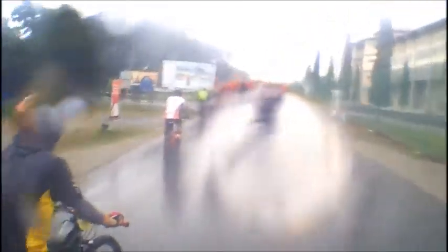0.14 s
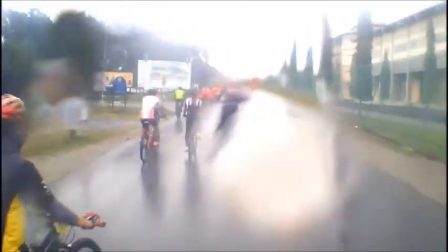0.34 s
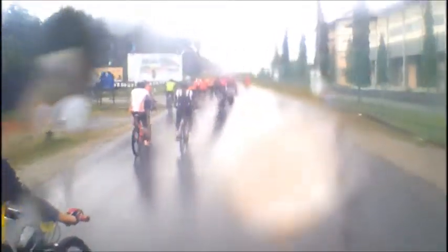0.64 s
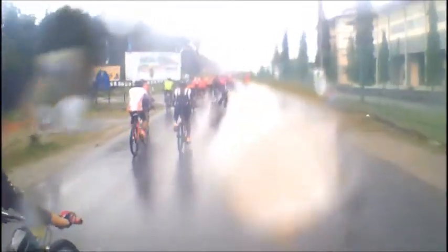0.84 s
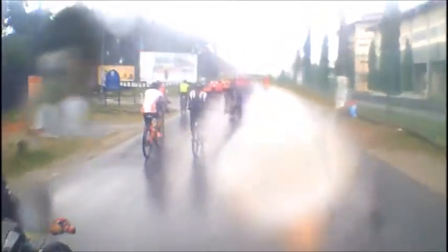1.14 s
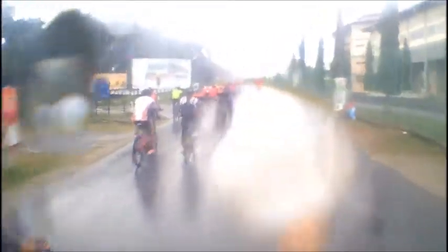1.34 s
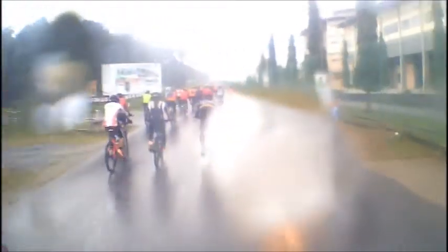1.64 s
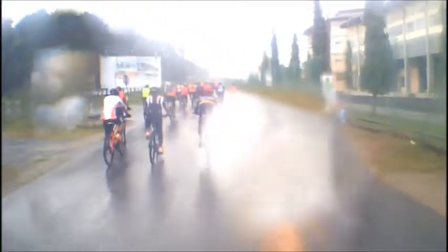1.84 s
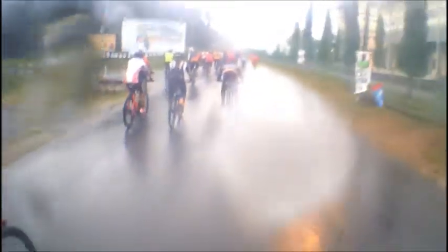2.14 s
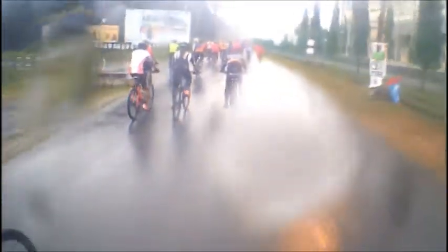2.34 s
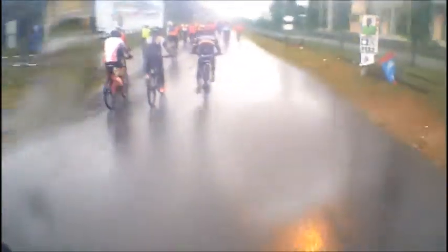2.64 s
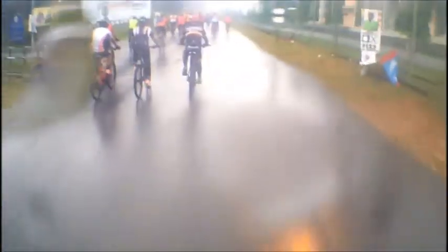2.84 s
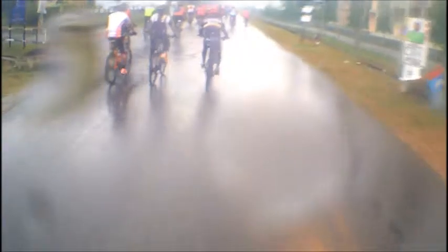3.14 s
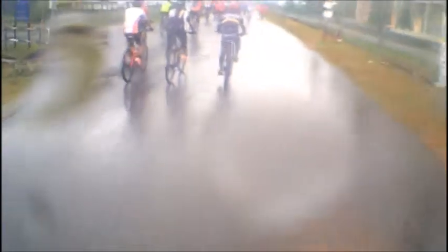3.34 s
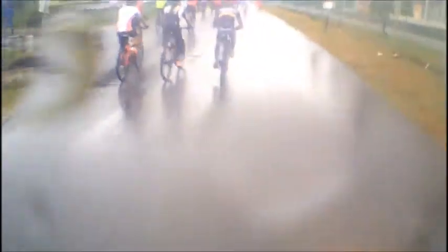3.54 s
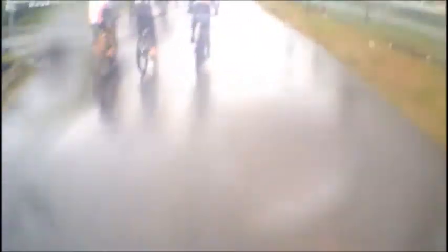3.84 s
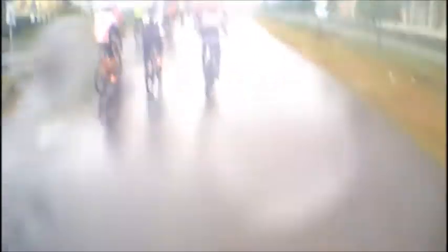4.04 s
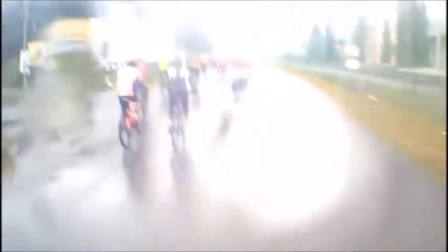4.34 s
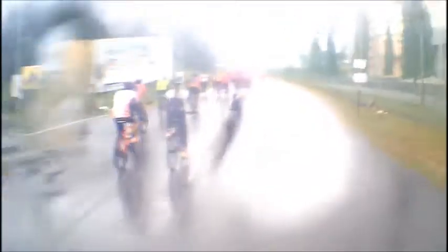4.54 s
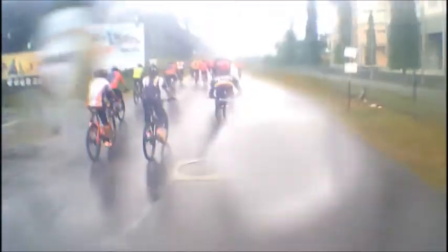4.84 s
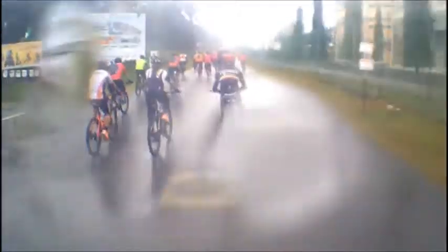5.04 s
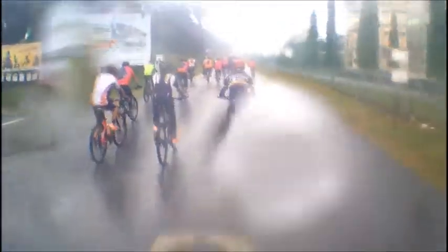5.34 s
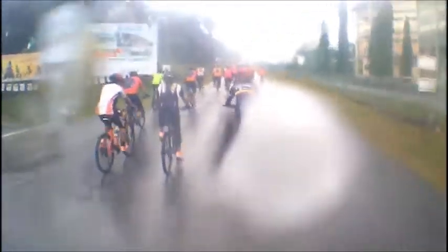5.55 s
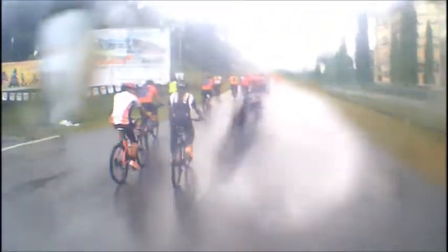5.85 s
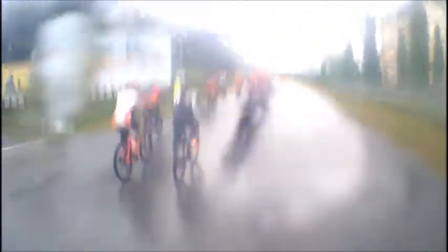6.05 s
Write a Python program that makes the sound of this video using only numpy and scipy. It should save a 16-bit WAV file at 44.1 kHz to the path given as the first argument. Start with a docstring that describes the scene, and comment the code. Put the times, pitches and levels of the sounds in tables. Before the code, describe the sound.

Irregular hard plastic clacks, taps and ticks as rain and spray strike a camera case on a bicycle, over quiet low rumble and muffled wet-road hiss.

```python
"""A wet road in the rain: a small camera in a plastic case rides on a bicycle.
Its electronics tick and whine faintly: gated noise and sines of wandering phase.
The frame sways and rumbles, the road hums and wet tyres hiss through the case: shaped noise.
The mount sings and thumps: decaying sines.
Nearest of all, drops and spray strike the case, which clacks: short forces excite its modes."""
import sys
import numpy as np
from scipy import signal
from scipy.fft import rfft, irfft
from scipy.io import wavfile

SR = 44100
rng = np.random.default_rng(int(sys.argv[2]) if len(sys.argv) > 2 else 0)


def dump(signal):
    """Clip the signal to [-1, 1] and save it as 16-bit WAV at the path in sys.argv[1]."""
    limited = np.clip(np.atleast_2d(signal).T, -1, 1)
    pcm = np.round(limited * 32767).astype(np.int16)
    wavfile.write(sys.argv[1], SR, pcm)


N = 272538

# modes of the case walls: f/Hz, relative level/dB, 60 dB decay time/s
WALL_MODES = [(1045, -1, 0.028), (1215, -7, 0.046), (1361, -1, 0.015), (1460, -3.5, 0.0075),
              (1597, -2, 0.02), (1917, -5.5, 0.022), (2213, -5, 0.023), (2510, -17.5, 0.0094)]
# the road surface: t/s, road hum level/dB, tyre hiss level/dB, each before the offset of its source
ROAD = [(0.0, -66.5, -68.5), (0.86, -59, -66.5), (1.45, -63.5, -69), (1.76, -62.5, -66.5), (2.45, -61, -66),
        (2.71, -64, -68), (3.97, -65, -72), (4.35, -60, -64), (4.88, -62, -70), (5.45, -64.5, -68),
        (5.64, -62, -68.5), (6.15, -66.5, -66)]


def from_db(db):
    """Level to amplitude ratio: 20 dB is a factor of ten."""
    return 10 ** (np.asarray(db) / 20)


def rms_one(x):
    """Normalisation to unit root-mean-square amplitude."""
    return x / np.sqrt(np.mean(x ** 2) + 1e-20)


def at_level(x, db):
    """Level set by the root-mean-square amplitude of the first 15 ms."""
    return from_db(db) * x / np.sqrt(np.mean(x[:662] ** 2) + 1e-20)


def add(out, s, sound):
    """Superposition: mixes a sound in at time s."""
    at = int(np.clip(round(s * SR), 0, N - 1))
    out[at:at + len(sound)] += sound[:N - at]


def in_time(rows):
    """Linear interpolation of the columns of a curve over time."""
    s, *columns = np.transpose(rows)
    return [np.interp(np.arange(N) / SR, s, c) for c in columns]


def drift(rate):
    """Slow random fluctuation: Gaussian knots, rate per second, joined by straight lines."""
    knots = rng.standard_normal(N // 40)
    return np.interp(np.arange(N) / SR * rate, np.arange(len(knots)), knots)


def noise(spectrum):
    """Spectral shaping of white noise, rms 1; the spectrum falls away beyond both ends."""
    hz, db = np.transpose(spectrum)
    log_f = np.log(np.maximum(np.arange(N // 2 + 1) * SR / N, 1e-3))
    outside = np.abs(log_f - np.clip(log_f, np.log(hz[0]), np.log(hz[-1])))
    gain = from_db(np.interp(log_f, np.log(hz), db) - 38 * outside)
    return rms_one(irfft(rfft(rng.standard_normal(N)) * gain, N))


def band(x, low_hz, high_hz):
    """Gentle causal band-pass."""
    sos = signal.butter(2, [low_hz, min(high_hz, .45 * SR)], "band", fs=SR, output="sos")
    return signal.sosfilt(sos, x)


def ring(force, hz, t60):
    """Damped resonator: a unit impulse starts a decaying sine of initial height about 1."""
    r, w = from_db(-60 / (t60 * SR)), 2 * np.pi * hz / SR
    return signal.lfilter([0, np.sin(w)], [1, -2 * r * np.cos(w), r * r], force + 1e-18)


def hiss_and_bursts():
    """Gated noise: a steady hiss, louder in short bursts of interference that repeat periodically."""
    # noise spectrum: f/Hz, relative level/dB
    mic_hiss = [(300, 14.5), (3000, 2), (6000, -5.5), (10000, -7), (15500, -8)]
    # bursts in each cycle: t/s of the centre within the cycle, added amplitude as level/dB
    bursts = [(.0045, -59.5), (0.0164, -61), (0.0764, -66.5)]
    cycle_s, half_burst_s = .08, .0012
    phase_s = np.arange(N) / SR % cycle_s
    gate = sum(from_db(db) * (np.abs(phase_s - s) < half_burst_s) for s, db in bursts)
    return (from_db(-68.5) + gate) * noise(mic_hiss)


def whine():
    """Phase modulation: thin tones of the electronics waver as their phases wander."""
    # tones: f/Hz, peak level/dB
    tones = [(3125, -85), (4690, -89), (6250, -89), (12500, -81), (13250, -91), (14050, -96)]
    t = np.arange(N) / SR
    return sum(from_db(db) * np.sin(2 * np.pi * hz * t + 1.8 * drift(110)) for hz, db in tones)


def electronics():
    """Superposition of hiss, interference and whine."""
    return hiss_and_bursts() + whine()


def frame():
    """Low-frequency vibration: steady sway, and rumble that follows the shaking of the frame."""
    # noise spectra: f/Hz, relative level/dB
    sway_spectrum = [(3, -14), (8, 0), (12, 0), (16, -12), (24, -30)]
    rumble_spectrum = [(12, -10), (20, 0), (34, -4), (50, -18), (80, -29), (160, -50)]
    # shaking of the frame: t/s, rumble level/dB
    shake = [(0, -54), (.18, -40), (.3, -37), (.5, -41.5), (.88, -33), (.97, -56), (1.2, -39.5),
             (1.45, -43), (3.9, -46), (4.26, -40), (4.4, -47), (4.65, -38.5), (5.35, -52.5), (5.5, -28.5),
             (5.85, -54), (6.15, -29)]
    rumble_db, = in_time(shake)
    sway = from_db(-28.5) * noise(sway_spectrum)
    return sway + from_db(rumble_db) * noise(rumble_spectrum)


def road_hum():
    """Amplitude-modulated noise: hum that follows the road surface and fluctuates at random."""
    # noise spectrum: f/Hz, relative level/dB
    hum_spectrum = [(45, 0), (75, 4), (105, 2), (150, -5), (230, -6.5), (400, -21.5), (650, -28),
                    (1200, -20.5)]
    offset_db, flutter_db = 2, 4.6
    hum_db, _ = in_time(ROAD)
    return from_db(hum_db + offset_db + flutter_db * drift(25)) * noise(hum_spectrum)


def drizzle(per_s, size_db):
    """Random impulses of either sign excite the wall modes: the patter of fine spray; rms 1."""
    born = rng.random(N) < per_s / SR
    sizes = born * from_db(size_db * rng.random(N)) * rng.choice([-1, 1], N)
    patter = np.zeros(N)
    for hz, db, t60 in WALL_MODES[:6]:
        # each impulse excites each mode to a different degree
        force = sizes * rng.uniform(0.17, 1, N)
        patter += ring(force, hz, t60) * from_db(db)
    return rms_one(patter)


def wet_tyres():
    """Filtered turbulence: tyre hiss muffled by the case, and spray, both following the road."""
    # noise spectrum heard through the case: f/Hz, relative level/dB
    hiss_spectrum = [(400, -16.5), (750, -15), (1080, 6), (1220, -0.5), (1350, 4), (1470, 3), (1620, 10),
                     (1770, -2), (1900, 7), (2250, -9.5), (2700, -31), (3100, -11.5), (3700, -70),
                     (4300, -17.5), (7000, -17.5)]
    hiss_offset_db, flutter_db, spray_offset_db = 0.5, 1.27, -2
    _, tyre_db = in_time(ROAD)
    hiss = from_db(tyre_db + hiss_offset_db + flutter_db * drift(30)) * noise(hiss_spectrum)
    spray = from_db(tyre_db + spray_offset_db) * drizzle(per_s=42, size_db=32)
    return hiss + spray


def ride():
    """Superposition of the vibration of the frame, the hum of the road and the wet tyres."""
    return frame() + road_hum() + wet_tyres()


def mount():
    """Transient response: hard drops set off a decaying sine, jolts from the road a brief low thump."""
    # hard drops that set the mount singing: t/s, initial envelope level/dB
    hits = [(0.6734, -38), (5.227, -49)]
    # jolts from the road: t/s, peak envelope level/dB, f/Hz
    jolts = [(0.207, -39, 114), (0.284, -39.5, 84.6), (0.85, -41, 92), (1.35, -51, 185), (2.543, -69, 139),
             (2.894, -49, 126), (2.946, -57.5, 162), (3.381, -50.5, 180), (4.418, -54.5, 185),
             (4.495, -45, 167), (5.786, -55, 189)]
    mount_hz, mount_t60_s, rise_s = 1305, 0.16, 0.0071
    out, t = np.zeros(N), np.arange(SR // 4) / SR
    for s, db in hits:
        add(out, s, from_db(db - 60 * t / mount_t60_s) * np.sin(2 * np.pi * mount_hz * t))
    swell = t / rise_s
    envelope = swell * np.exp(1 - swell)
    for s, db, hz in jolts:
        add(out, s, from_db(db) * envelope * np.sin(2 * np.pi * hz * t))
    return out


def struck(force, modes, spot_hz, spot_db, scatter_db):
    """Modal superposition: the spot hit favours modes near one pitch; neighbours swing oppositely."""
    out = 0
    for k, (hz, db, t60) in enumerate(modes):
        favour = spot_db * np.exp(-(np.log(hz / spot_hz) / 0.41) ** 2)
        level_db = db + favour + rng.normal(0, scatter_db)
        out = out + (-1) ** k * at_level(ring(force, hz, t60), level_db)
    return out


def drop(contact_s, pitch_hz, thud_db, wall_db, rim_db, crack_db):
    """Impact excitation: a snap, then a spreading splash that grows with contact time, drives the case."""
    # modes of the rim and of its crack: f/Hz, relative level/dB, 60 dB decay time/s
    rim_modes = [(3000, 4.5, 0.015), (3396, 0, 0.01), (3600, -2.5, 0.024), (3900, 0.5, 0.0048),
                 (4290, 5, 0.016), (5030, 0.5, 0.0074), (5890, -6.5, 0.0097)]
    crack_modes = [(6470, 11, 0.0063), (7630, 8.5, 0.0035), (8870, 2.5, 0.0085), (10360, 7.5, 0.0025),
                   (12200, -6.5, 0.0059), (14100, -10, 0.00082)]
    t = np.arange(4096) / SR
    spread_s = max(contact_s, 1e-4) * 0.73
    splash = rng.standard_normal(len(t)) * t / spread_s * np.exp(-t / spread_s)
    force = splash / np.linalg.norm(splash) * (spread_s / 0.00079) ** 3.5
    force[0] += 1  # the snap
    wall = struck(force, WALL_MODES, pitch_hz, spot_db=15.5, scatter_db=4.0)
    wall = band(band(wall, 620, 2400), 790, 5200)
    # the stronger the crack against the rim, the higher the rim modes that answer
    rim_hz = np.interp(crack_db - rim_db, [-22, -10], [3200, 4800])
    rim = band(struck(force, rim_modes, rim_hz, spot_db=4.5, scatter_db=2.5), 2260, 12000)
    crack = band(struck(force, crack_modes, pitch_hz, spot_db=0, scatter_db=2.5), 3900, 21000)
    # the whole case shudders on its mount for a moment
    shudder = force + 0.19 * rng.standard_normal(len(t)) * np.exp(-t / 0.0072)
    thud = band(shudder, 54, 650)
    return at_level(thud, thud_db) + at_level(wall, wall_db) + at_level(rim, rim_db) + at_level(crack, crack_db)


def light_drops():
    """Uniform random arrivals: rows for light drops, with the same columns as the heavy ones."""
    per_s, mean_db, spread_db, centre_hz = 2, -57.5, 1, 1260
    thud_db, rim_db = -12, -21  # against the wall ring
    rows = []
    for when, strength, spot in rng.random((int(per_s * N / SR), 3)):
        wall_db = mean_db + spread_db * (2 * strength - 1)
        pitch_hz = centre_hz * 2 ** ((spot - .5) / 2)
        rows.append((when * N / SR, wall_db, pitch_hz, wall_db + thud_db, wall_db + rim_db))
    return rows


def rain():
    """Impact scaling: a stronger drop has a shorter contact; a hit near the rim also cracks."""
    # heavy drops: t/s, wall ring level/dB, strongest pitch f/Hz, thud level/dB, rim ring level/dB
    drops = [(.152, -43, 1810, -73, -48.5), (.166, -43, 1250, -58, -63), (.219, -46, 1620, -55, -69),
             (.419, -47, 1180, -58, -69), (.4355, -43.5, 1570, -52.5, -52), (.6719, -21, 1760, -65, -33.5),
             (.7347, -23.5, 1710, -52.5, -38), (.827, -48.5, 1430, -55, -71),
             (.8515, -36, 1300, -45.5, -69), (.869, -52.5, 1500, -55, -73), (.966, -51.5, 1250, -70, -79),
             (1.009, -47.5, 1260, -51, -61), (1.1095, -39.5, 1380, -56, -43.5),
             (1.1425, -43.5, 1540, -52.5, -65.5), (1.2615, -44.5, 1440, -68, -58),
             (1.292, -43.5, 1120, -61, -68), (1.5105, -39.5, 1740, -57.5, -56.5),
             (1.563, -49.5, 1480, -55, -61.5), (1.703, -53, 1270, -52.5, -78),
             (1.8581, -35.5, 1450, -48.5, -68), (1.9221, -32.5, 1350, -40.5, -41.5),
             (2.056, -49, 1270, -76, -73), (2.1315, -52, 1090, -61, -73), (2.285, -51.5, 1480, -58, -70),
             (2.4716, -48.5, 1330, -66, -83), (2.524, -45, 1110, -58, -74), (2.7106, -48, 1460, -58, -69),
             (2.7472, -53.5, 1110, -73, -74), (2.8971, -34.5, 1400, -46.5, -59),
             (3.1458, -45, 1400, -64, -65), (3.425, -46, 1260, -48.5, -80),
             (3.4795, -42.5, 1450, -53.5, -59.5), (3.595, -50, 1350, -62, -72),
             (3.7645, -53, 1610, -59.5, -70), (4.031, -50, 1100, -64, -69), (4.172, -38, 1410, -52, -59.5),
             (4.192, -41, 1330, -60, -67), (4.2225, -47, 1430, -54, -66), (4.2988, -22.5, 2270, -43, -28.5),
             (4.447, -47, 1370, -71, -73), (4.494, -36.5, 1430, -40, -57.5),
             (4.533, -32.5, 1380, -51.5, -52.5), (4.6005, -40, 1450, -63, -63),
             (4.856, -41.5, 1430, -64, -55), (4.883, -46.5, 1290, -58, -67), (5.2262, -26, 1860, -49, -28),
             (5.3507, -42.5, 1400, -53.5, -79), (5.393, -48.5, 1190, -57.5, -78),
             (5.4849, -36.5, 1550, -44, -58), (5.580, -51.5, 1680, -61, -60),
             (5.6329, -39.5, 1180, -55, -48.5), (5.852, -42, 1330, -54, -55.5),
             (5.9675, -48.5, 1440, -76, -63)]
    # contact of a typical drop, and the extra strength that halves it
    typical_db, typical_contact_s, halving_db = -42.5, .0013, 13
    # crack level against the rim ring, and its growth per dB that the rim gains on the walls
    crack_offset_db, crack_growth = -10.5, 0.79
    out = np.zeros(N)
    for s, wall_db, pitch_hz, thud_db, rim_db in list(drops) + light_drops():
        extra_db = max(wall_db, typical_db) - typical_db
        contact_s = typical_contact_s * 2 ** (-extra_db / halving_db)
        crack_db = rim_db + crack_offset_db + crack_growth * (rim_db - wall_db)
        add(out, s, drop(contact_s, pitch_hz, thud_db, wall_db, rim_db, crack_db))
    return out


def scene():
    """Superposition at one microphone inside the case."""
    return (electronics() + ride() + mount() + rain())[None]


def record(dry):
    """Band limitation: a steep elliptic low-pass cuts the top at 15550 Hz."""
    return signal.sosfilt(signal.ellip(10, .1, 80, 15550, fs=SR, output="sos"), dry)


dry = scene()
out = record(dry)
dump(out)
```